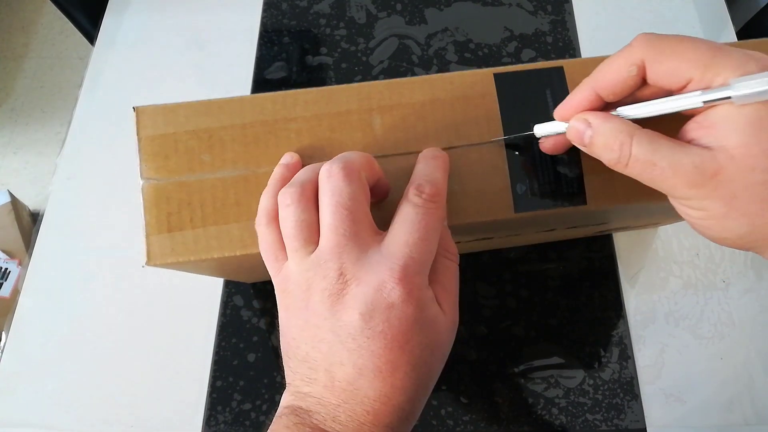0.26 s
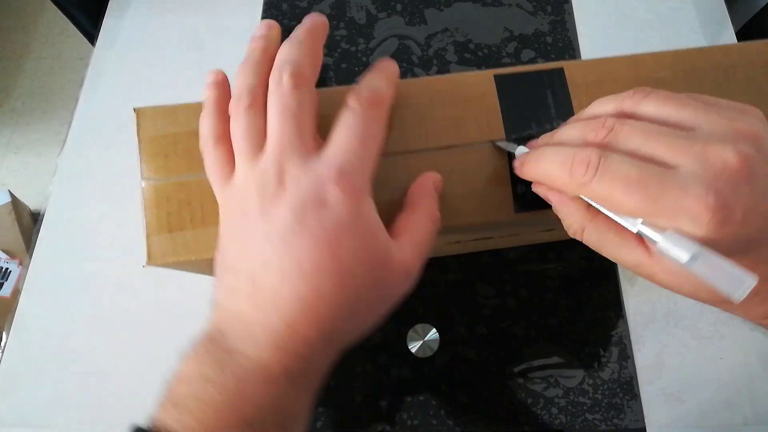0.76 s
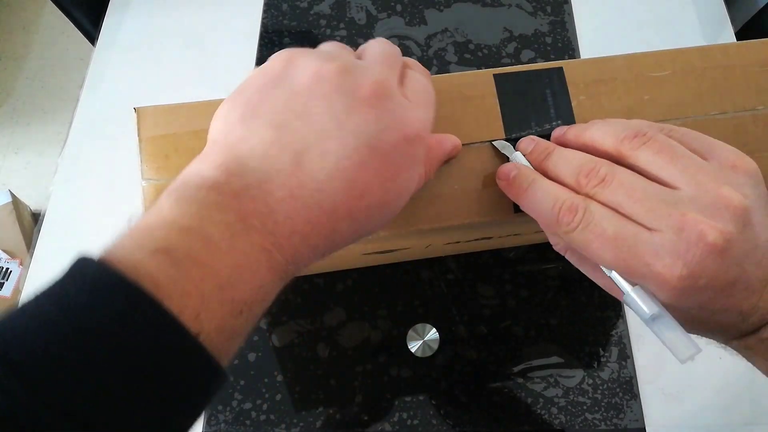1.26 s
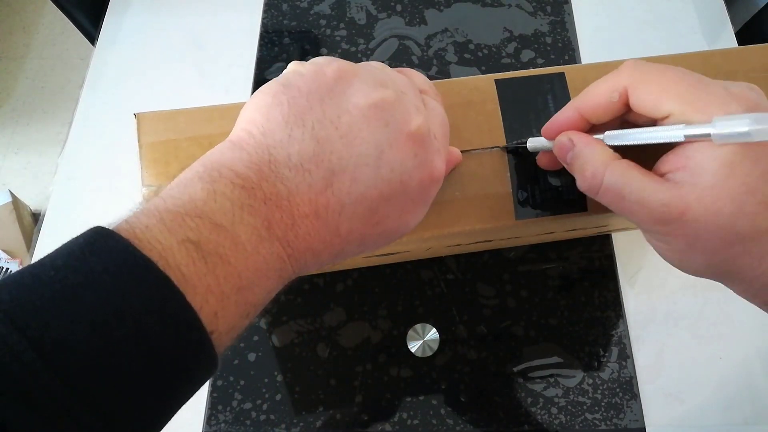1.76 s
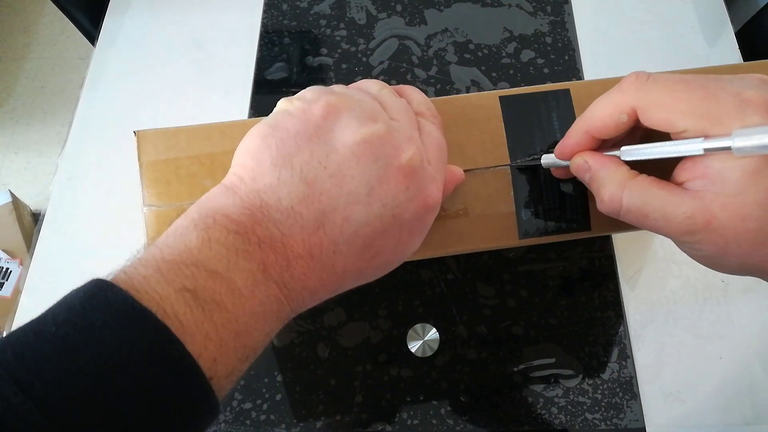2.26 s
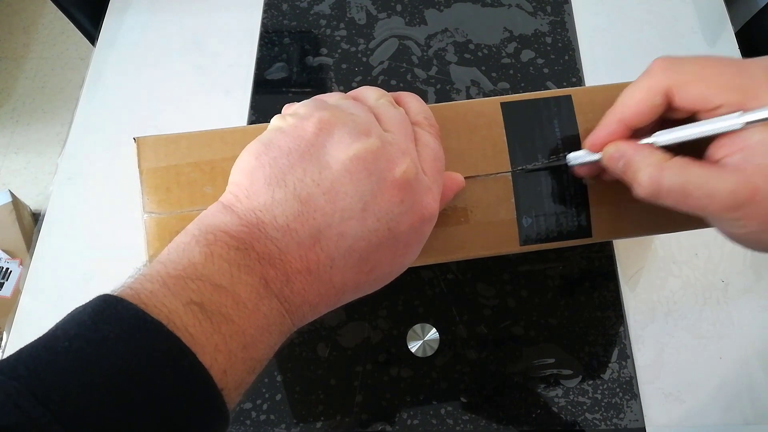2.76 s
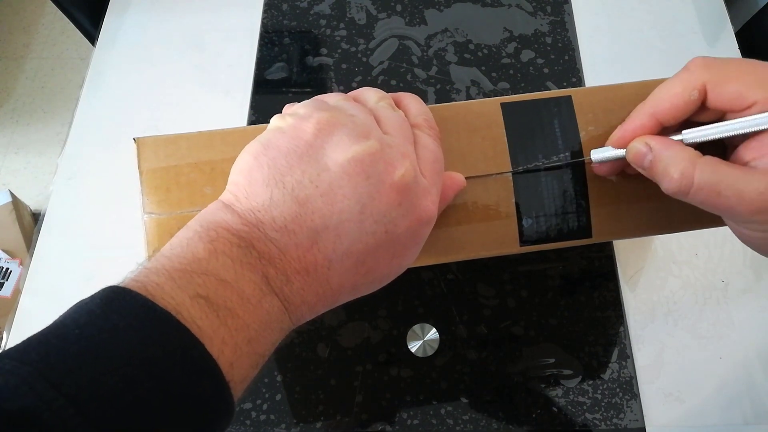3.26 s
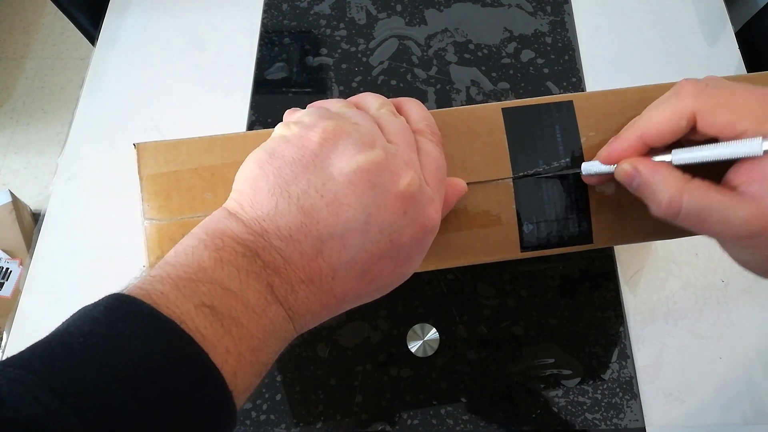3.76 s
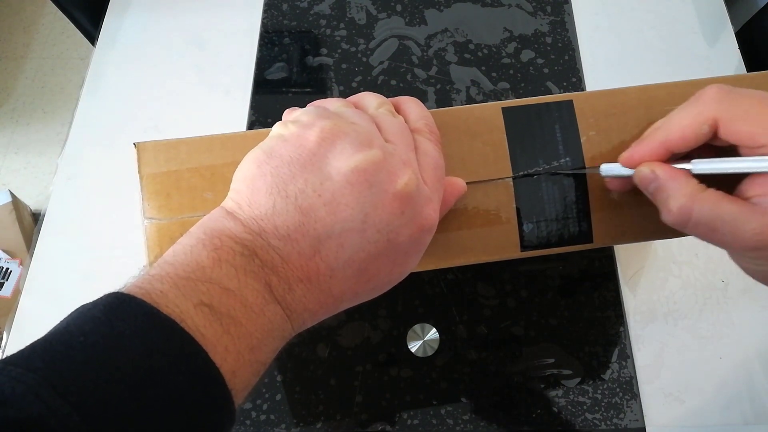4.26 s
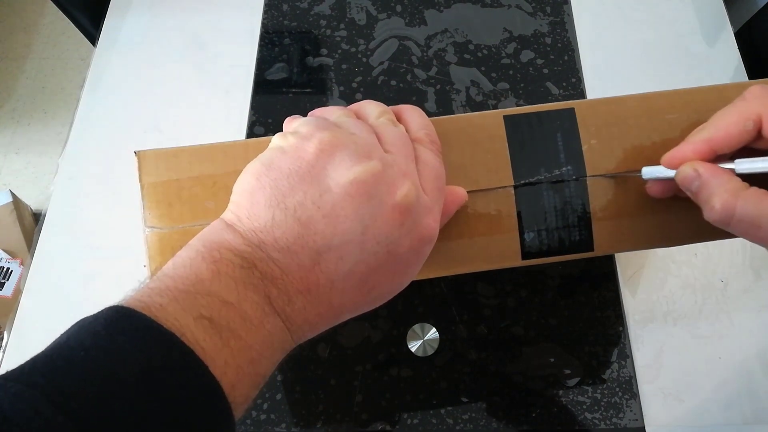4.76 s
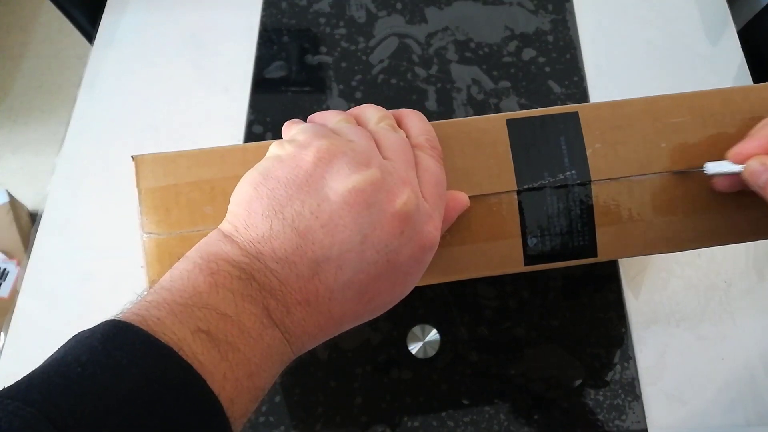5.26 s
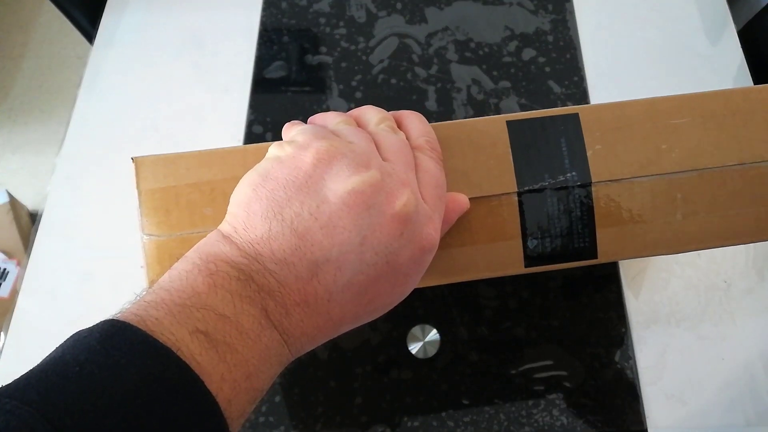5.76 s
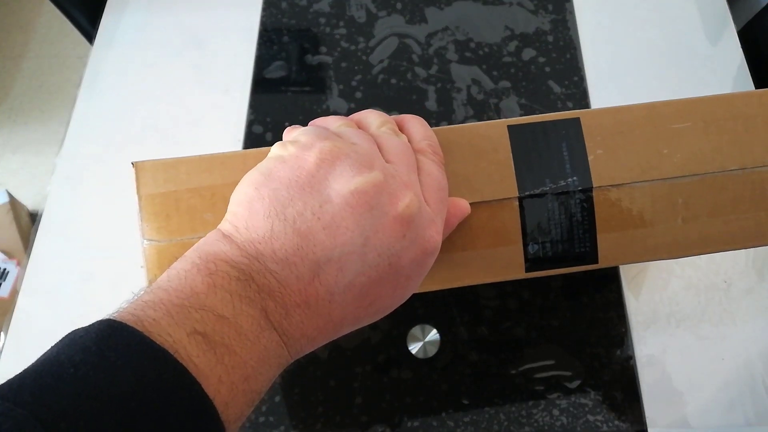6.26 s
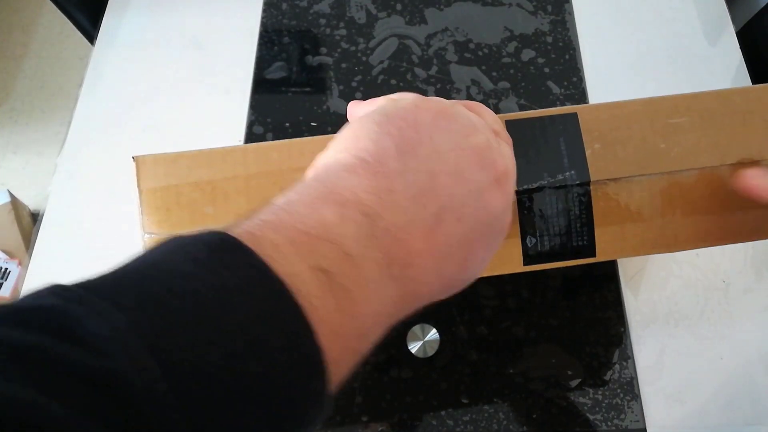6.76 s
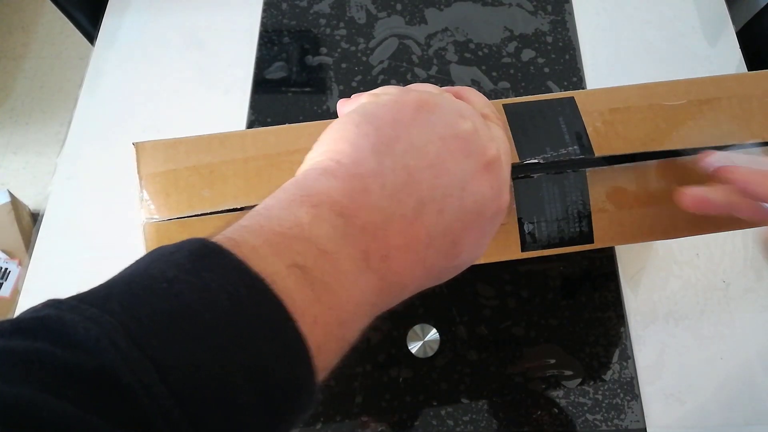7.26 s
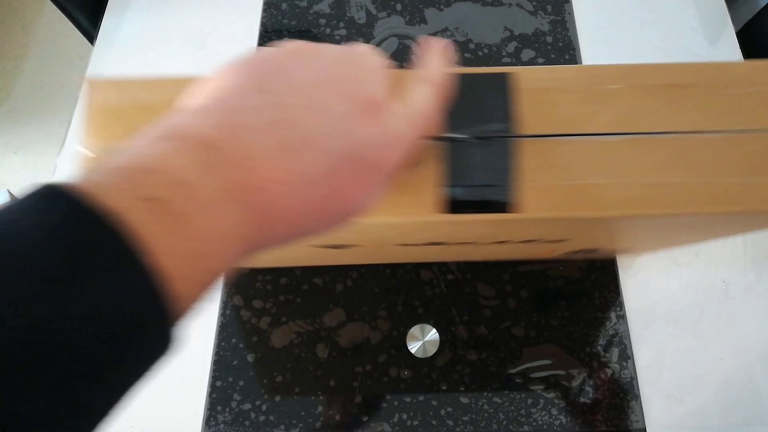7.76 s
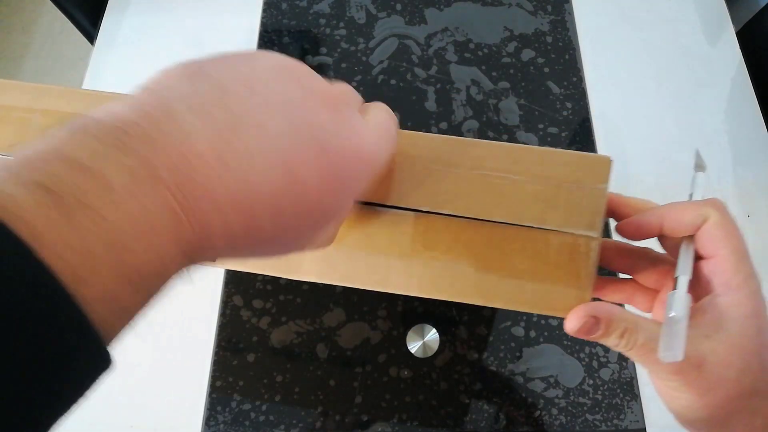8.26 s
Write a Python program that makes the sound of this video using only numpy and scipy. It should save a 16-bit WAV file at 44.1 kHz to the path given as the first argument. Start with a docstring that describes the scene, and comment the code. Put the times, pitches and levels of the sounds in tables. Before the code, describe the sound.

Tape hisses and snaps as a blade rasps along a cardboard box seam, while hands knock and shift the hollow box indoors.

```python
"""A light tap, a scrape and a hollow knock: a craft knife is worked along the taped seam of a long
cardboard box, under a camera's stereo microphone in a small hard room. The blade rasps on the card and
slits the hissing tape in strokes; tape snaps, fingers and blade tap the box, whose air and walls boom.
The seam's treble reaches the right microphone port more strongly. A quiet room tone lies underneath."""
import sys
import numpy as np
from scipy import signal
from scipy.fft import rfft, irfft, next_fast_len
from scipy.io import wavfile
from scipy.ndimage import map_coordinates

SR = 44100
rng = np.random.default_rng(int(sys.argv[2]) if len(sys.argv) > 2 else 0)


def bounce(signal):
    """Save signal as a 16-bit WAV file at the path given by the first command-line argument."""
    frames = np.transpose(np.atleast_2d(signal))
    limited = np.clip(frames, -1, 1)
    pcm = np.round(limited * 32767).astype(np.int16)
    wavfile.write(sys.argv[1], SR, pcm)


N = 375732

# Snaps and taps. Each row: start in seconds, tape tick in dB, its pitch in Hz, wall click in dB,
# its pitch in Hz, box thud in dB, the tick's left over right in dB.
BLOWS = [(0.0, -54, 6700, -34.5, 1005, -42.5, -24), (0.378, -29, 4500, -10.5, 935, -21, -2),
         (0.473, -50, 6440, -50, 2360, -42, -12), (0.524, -49, 6400, -34, 1220, -45, -5),
         (0.636, -49, 6450, -44.5, 1270, -57, -2), (0.8549, -66, 6960, -37.5, 2450, -45, -25),
         (0.866, -51, 6800, -35, 2120, -32, -30), (1.21, -52, 7860, -52, 1580, -63, -28),
         (1.231, -50, 7040, -48, 1660, -65, -18), (1.269, -45.5, 6740, -41, 2020, -72, -25),
         (1.3569, -9, 7200, -22.5, 1920, -82, -7), (1.503, -39, 6900, -45, 1390, -64, -8),
         (1.52, -41.5, 6900, -53, 1610, -68, -7), (1.6594, -29.5, 7160, -72, 2750, -68, -3),
         (2.33, -44.5, 6820, -41, 1660, -84, -6), (2.848, -36, 7060, -28, 1330, -45, -1),
         (2.887, -23.5, 7900, -58, 1320, -58, 4), (2.894, -32, 6600, -25, 1370, -41.5, 9),
         (3.1661, -30.5, 8360, -30, 1000, -46, -16), (3.169, -30.5, 3450, -22.5, 910, -39, -15.5),
         (3.2992, -51.5, 7150, -34.5, 1032, -45.5, -18), (3.551, -74, 6970, -47, 1197, -60, -9),
         (3.906, -19.5, 7540, -23.5, 1280, -47, -7.5), (3.919, -43, 7560, -23, 900, -40.5, -27),
         (3.992, -33, 7500, -25.5, 1500, -31, -10), (4.179, -52.5, 7400, -40.5, 1100, -75, -12),
         (4.4077, -40, 7300, -31, 1230, -79, -13), (4.7896, -27, 7600, -24.5, 1300, -37.5, -9),
         (4.855, -42, 7440, -30, 1420, -52, -18), (4.939, -44.5, 6840, -42.5, 1710, -86, -5),
         (6.383, -17, 8700, -35, 1243, -32.5, -6), (6.3929, -20, 6900, -15, 1210, -30, 0),
         (6.509, -48, 7140, -32.5, 1870, -42.5, -9), (6.6995, -23, 5160, -12, 2210, -77, 6),
         (6.7019, -14, 5150, -1, 2330, -36.5, -23), (6.971, -33, 5870, -35, 1600, -54, -5),
         (7.0062, -26, 6750, -24, 1380, -52, -6), (7.0103, -13.5, 7700, -7.5, 1400, -21.5, -14.5),
         (7.6438, -41, 6650, -28.5, 1880, -26, -31), (7.65, -43, 7000, -31.5, 1060, -30, 17),
         (7.689, -60, 6940, -31, 1183, -53, 2), (7.946, -56, 7000, -31.5, 2060, -47, 7),
         (7.978, -59, 7150, -35.5, 1400, -75, -5)]
# Air and wall modes of the box. Each row: pitch in Hz, level in dB, t60 in seconds,
# change in a thud's level in dB once the flaps have parted.
BOX_MODES = [(126.8, 1.5, 0.22, 15), (169.4, 7.5, 0.39, 3), (225.8, 4, 0.63, -8), (265.4, -10, 0.53, 5.5),
             (300.2, -5.5, 0.35, 6), (355, -6.5, 0.087, 1), (412, -8, 0.12, 3), (471.6, -7.5, 0.08, 0),
             (612, -13, 0.053, 8)]
# Air sound at the two ports. Each row: frequency in Hz, left-right likeness from 0 to 1.
AIR_LIKENESS = [(40, 0.98), (200, 1), (600, 0.056), (3000, 0.17), (12000, 0.026)]
SIDES = np.array([[.5], [-.5]])  # half to the left port, the opposite half to the right


def amp(db):
    return 10 ** (np.asarray(db) / 20)


def unit(x):
    return x / np.sqrt(np.mean(x ** 2) + 1e-20)


def along(points, hz):
    """A curve through (Hz, value) points on a log axis."""
    f, v = np.transpose(points)
    return np.interp(np.log(hz + 1), np.log(f + 1), v)


def wobble(rate):
    """A smooth random curve, rate knots a second."""
    return map_coordinates(rng.standard_normal(int(N * rate / SR) + 4), [np.arange(N) * rate / SR])


def filtered(x, response):
    """x through a complex response of frequency."""
    size = next_fast_len(N + SR)
    return irfft(rfft(x, size) * response(np.fft.rfftfreq(size, 1 / SR)), size)[..., :N]


def butter(x, order, hz, kind):
    return signal.sosfilt(signal.butter(order, hz, kind, fs=SR, output="sos"), x)


def spread(pair, spectrum, likeness):
    """Two unrelated signals coloured and mixed to a left-right likeness; rms 1."""
    turn = lambda hz: np.arccos(np.clip(along(likeness, hz), -1, 1)) / 2
    mid, side = filtered(pair, lambda hz: spectrum(hz) * [np.cos(turn(hz)), np.sin(turn(hz))])
    return unit(np.array([mid + side, mid - side]))


def rise(t, seconds):
    return 1 - np.exp(-t / seconds)


def tape_tick(t, db, hz):
    """Tape snaps with a brief ring and a crackle; it is too thin to move any bass."""
    ring_t60 = np.clip(-.0001 * db, .0008, .0028)  # a hard snap is over in a few swings
    ring = amp(db + 2.5 - 60 * t / ring_t60) * rise(t, 0.04 * ring_t60) ** 2 * np.sin(2 * np.pi * hz * t)
    crackle = 1.16 * butter(rng.standard_normal(len(t)), 2, [0.87 * hz, 1.353 * hz], "band")
    crackle *= amp(0.78 * db - 9 - 60 * t / 0.0062)
    return butter(ring + crackle, 4, 1100, "high")


def wall_click(t, db, hz):
    """A patch of wall, too small to move bass, clicks; the flap edge buzzes on in a narrow band."""
    ring_cycles, noise_t60, buzz_t60 = 3.45, 0.013, 0.33
    ring = amp(db + 5.5 - 60 * t * hz / ring_cycles) * rise(t, 0.00029) * np.sin(2 * np.pi * hz * t)
    noise = amp(db - 6 - 60 * t / noise_t60) * butter(rng.standard_normal(len(t)), 3, 2 * hz, "low")
    buzz = butter(rng.standard_normal(len(t)), 2, [2210, 2697], "band")
    buzz *= amp(db - 23.5 - 60 * t / buzz_t60)
    return butter(ring + noise + buzz, 3, 0.57 * hz, "high")


def box_thud(t, db, start):
    """The wall gives under a blow in one dull push, and the box modes near that pitch ring on."""
    # The boom shifts with the grip and as the flaps part. Each row: time in seconds, centre in Hz.
    boom_centres = [(0, 219), (.38, 200), (.6, 219), (.85, 160), (3.0, 174), (3.2, 302), (3.9, 187),
                    (6.4, 178), (6.7, 297)]
    centre_hz = np.interp(start, *np.transpose(boom_centres))
    parted = start > 6.9  # the flaps gape from here on and push less air
    hz, mode_db, t60, parted_db = np.transpose(BOX_MODES)[:, :, None]
    drive_db = -18 * np.abs(np.log2(hz / centre_hz)) + rng.normal(0, 2.5, hz.shape)
    skew = hz / 900 * rng.normal(0, 0.73, hz.shape) * SIDES[:, None]  # high modes arrive out of step
    grip = rng.standard_normal((len(BOX_MODES), 16))  # each mode swells and sags as the grip shifts
    waver_db = 2.8 * np.array([map_coordinates(knots, [t * 28]) for knots in grip])
    ring_db = db - 10.5 + mode_db + parted_db * parted + drive_db + waver_db - 60 * t / t60
    ring = np.sum(amp(ring_db) * np.sin(2 * np.pi * hz * t + skew), 1)
    push = amp(db + 5.5 - 11.5 * parted - 60 * t / 0.033) * np.sin(2 * np.pi * centre_hz * t)
    return (ring + push) * rise(t, 0.0011)  # the air inside takes a moment to swing up


def snaps_and_taps():
    """Each blow is a tape tick, a wall click and a box thud, too blunt for the top octave."""
    out, t = np.zeros((2, N + SR)), np.arange(SR // 2) / SR
    for start, tape_db, tape_hz, wall_db, wall_hz, thud_db, pan_db in BLOWS:
        tick = tape_tick(t, tape_db, tape_hz) * amp(pan_db * SIDES)
        click = wall_click(t, wall_db, wall_hz) * amp(0.033 * pan_db * SIDES)
        k = round((start + .0003) * SR)
        out[:, k:k + len(t)] += tick + click + box_thud(t, thud_db, start)
    dull = lambda hz: (1 / (1 + 1j * hz / 10000 * 1.045 - (hz / 10000) ** 2)) ** 2
    return filtered(out[:, :N], dull)


def pressure(t):
    """Gains of wall rasp, tape hiss and box drumming: the long cut, strokes, shaking after each blow."""
    # The long cut to the end of the seam. Each row: time in seconds, then rasp, hiss and drumming in dB.
    long_cut = [(5.148, -73, -75, -80), (5.269, -61.5, -59.5, -69), (5.451, -58.5, -56, -58.5),
                (5.7, -53.5, -52, -54.5), (5.901, -57.5, -55, -56), (5.97, -60, -59, -57),
                (6.052, -68, -77, -72)]
    # Blade and hands along the box. Each row: start and length in seconds, first and last rasp level
    # in dB, then hiss and drumming in dB over the rasp.
    strokes = [(0.01, 0.44, -69, -74.5, -5.5, 4.5), (0.663, 0.083, -64.5, -65.5, -3, 3.5),
               (0.872, 0.013, -68.5, -78, 7, 7), (0.955, 0.2, -65.5, -74.5, 0, -0.5),
               (1.415, .12, -85, -72, 3, 1.5), (1.966, 0.012, -70, -80, -1, 2),
               (2.116, 0.011, -66, -80, -2, -9), (2.314, 0.28, -77, -67.5, -1.5, -9),
               (2.638, 0.19, -71.5, -54.5, -7, -6), (4.197, 0.08, -59, -67.5, -2.5, -2),
               (4.317, 0.026, -53.5, -52, -3.5, -5), (4.408, 0.1, -50, -66, -2.5, -2.5),
               (4.609, 0.087, -54.5, -65.5, -2.5, -4.5), (4.739, 0.13, -61, -67, 2.5, 6.5),
               (4.905, 0.22, -74.5, -71.5, 2.5, -13), (6.066, 0.039, -65.5, -62, 0, -6),
               (6.14, 0.062, -53.5, -50.5, 2.5, -6.5), (6.342, 0.029, -60.5, -57.5, -0.5, 0),
               (6.499, 0.011, -61.5, -62, 2.5, 3), (6.609, 0.065, -70, -63.5, -1.5, -7),
               (6.754, 0.37, -57, -63.5, 1.5, -2.5), (7.237, 0.326, -91, -79, -1.5, 12),
               (7.655, 0.056, -53.5, -59, 1.5, -15), (7.757, 0.4, -56, -58.5, 4.5, -4),
               (8.225, 0.1, -74, -68, 6, -2), (8.389, 0.017, -60.5, -59, -6.5, 4),
               (8.446, 0.098, -62.5, -62, 6.5, -5)]
    attack_db_per_s, release_db_per_s = 499, 355.5
    times, *levels = np.transpose(long_cut)
    gains = amp([np.interp(t, times, db, -150, -150) for db in levels])
    for start, length, first_db, last_db, tape_db, drum_db in strokes:
        age = t - start
        held = np.clip(age, 0, length)
        edge_db = attack_db_per_s * np.minimum(age, 0) - release_db_per_s * np.maximum(age - length, 0)
        rasp_db = first_db + (last_db - first_db) * held / length + edge_db
        gains += amp(rasp_db) * amp([[0], [tape_db], [drum_db]])
    for start, tape_db, _, wall_db, _, thud_db, _ in BLOWS:
        k = round(start * SR)
        age = t[k:k + SR] - start
        gains[0, k:k + SR] += amp(wall_db - 38 - 60 * age / 0.25)  # the flaps rustle on
        gains[1, k:k + SR] += amp(tape_db - 35.5 - 60 * age / 0.066)  # the tape fizzes on
        gains[2, k:k + SR] += amp(thud_db - 12.5 - 60 * age / 0.38)  # the box drums on
    return gains


def blade_catches():
    """The edge catches now and then: a gain that jumps above 1 and falls straight back."""
    per_second, fall_s = 19, 0.0021
    jolts = (rng.random(N) < per_second / SR) * rng.uniform(0.19, 1, N)
    return 1 + amp(-4.5) * signal.lfilter([1], [1, -np.exp(-1 / (fall_s * SR))], jolts)


def grit(per_second, spread_db):
    """Fibres giving way: random slips of uneven size, heard along two paths."""
    slips = rng.random(N) < per_second / SR
    sizes = amp(spread_db * np.minimum(rng.standard_exponential(N), 4))
    return slips * sizes * rng.standard_normal((2, N))


def flap_singing(t):
    """The flap edge sings under the blade: a fuzzy resonance that wanders."""
    # The edge's note. Each row: time in seconds, pitch in Hz, level in dB over the wall rasp.
    edge_notes = [(0, 1318, -6), (2.301, 1308, 3.5), (2.901, 1399, 2.5), (4.202, 1089, 6),
                  (4.452, 1290, -1), (5.3, 1250, 0), (5.54, 1234, 3), (5.69, 1540, -0.5), (5.789, 1322, 0),
                  (6.6, 1258, -20.5)]
    times, hz, db = np.transpose(edge_notes)
    pitch = np.interp(t, times, hz) * (1 + 0.04 * wobble(30))
    phase = 2 * np.pi * np.cumsum(pitch) / SR
    swell = amp(1.4 * wobble(14))
    fuzzy_note = wobble(600) * np.sin(phase) + wobble(600) * np.cos(phase)
    return amp(np.interp(t, times, db)) * unit(swell * fuzzy_note)


def box_response(hz):
    """The box modes as resonators of alternating sign; the faster the decay, the wider the peak."""
    response = 0
    for k, (mode_hz, db, t60, _) in enumerate(BOX_MODES):
        damping = 1j * hz * np.log(1000) / (np.pi * t60)
        response += (-1) ** k * amp(db) * damping / (mode_hz ** 2 - hz ** 2 + damping)
    return response


def tape_rips(t):
    """Short rips swell before they let go: added gains of wall rasp and tape hiss."""
    # Each row: crest in seconds, rasp and hiss in dB, swell and fall times in seconds.
    rips = [(2.856, -51, -49.5, 0.01, 0.009), (2.896, -48, -41.5, 0.0073, 0.0055),
            (4.753, -46.5, -49.5, 0.013, 0.019), (6.385, -35, -36.5, 0.011, 0.014),
            (6.853, -49, -39, 0.0025, 0.0054), (6.913, -75, -44.5, 0.0034, 0.0039),
            (7.943, -94, -45, 0.0054, 0.0119)]
    gains = np.zeros((2, N))
    for crest, wall_db, tape_db, swell, fall in rips:
        shape = np.exp(-np.abs(t - crest) / np.where(t < crest, swell, fall))
        gains += amp([[wall_db], [tape_db]]) * shape
    return gains


def box_squeaks(t):
    """The box chirps on the counter in short, fluttering tones."""
    # Each row: centre in seconds, pitch in Hz, level in dB, half length in seconds.
    chirps = [(7.322, 4930, -67, 0.0051), (7.877, 6780, -34, 0.01), (7.879, 5070, -44.5, 0.0082),
              (7.951, 7100, -44, 0.0052)]
    return sum(amp(db) * wobble(260) * np.exp(-((t - at) / half) ** 2) * np.sin(2 * np.pi * hz * t)
               for at, hz, db, half in chirps)


def rubbing():
    """Slips of the blade excite wall, tape and box air; the hand's pressure trembles."""
    # Rasp of the cardboard and hiss of the tape. Each row: frequency in Hz, spectral density in dB.
    rasp_spectrum = [(400, -18), (600, -3.5), (780, -4), (1250, -4.5), (1700, -5), (2300, -5), (3100, -10),
                     (4200, -20.5), (6000, -53.5)]
    hiss_spectrum = [(2800, -7.5), (4100, -5), (5100, -3), (5900, -1), (7000, 2), (8500, -1), (10000, -10),
                     (13000, -23), (16000, -33.5)]
    # Rasp and hiss at the two ports. Each row: frequency in Hz, left-right likeness from 0 to 1.
    rub_likeness = [(300, 0.39), (700, 1), (1300, 1), (3000, 0.1), (12000, 0.076)]
    # The seam as the microphone hears it. Each row: frequency in Hz, left over right in dB.
    port_balance = [(60, 4.5), (240, -1.5), (950, 0), (3770, -3), (15000, -12)]
    left_lag_s = 0.000786  # the scrape reaches the left port later
    t = np.arange(N) / SR
    wall_gain, tape_gain, drum_gain = pressure(t)
    wall_gain *= amp(0.91 * wobble(35) + 2.0 * wobble(110))
    tape_gain *= amp(1.2 * wobble(30))
    catches = blade_catches()
    wall_surge, tape_surge = tape_rips(t)
    wall_gain = wall_gain * catches + wall_surge
    tape_gain = tape_gain * np.sqrt(catches) + tape_surge
    rasp = spread(grit(3000, spread_db=-2.5), lambda hz: amp(along(rasp_spectrum, hz)), rub_likeness)
    singing = flap_singing(t)
    hiss = spread(grit(12000, spread_db=2.5), lambda hz: amp(along(hiss_spectrum, hz)), rub_likeness)
    drumming = spread(grit(4000, spread_db=1), box_response, AIR_LIKENESS)
    scrape = wall_gain * (rasp + singing) + tape_gain * hiss
    scrape = filtered(scrape, lambda hz: np.exp(-2j * np.pi * hz * left_lag_s * SIDES))
    seam = scrape + drum_gain * drumming + box_squeaks(t)
    return filtered(seam, lambda hz: amp(SIDES * along(port_balance, hz)))


def room_answer():
    """Near reflections, then a tail whose every frequency dies at its own speed."""
    # Decay of the small hard room. Each row: frequency in Hz, t60 in seconds.
    decay_times = [(100, 0.7), (300, 0.2), (1800, 0.38), (4000, 0.36), (8000, .26), (13000, 0.09)]
    # Table and near walls. Each row: mean delay in seconds, level in dB.
    reflections = [(.0028, -10.5), (.0095, -13.5)]
    hz, t, bands = signal.stft(rng.standard_normal((2, SR // 2)), SR, nperseg=256)
    likeness = np.clip(along(AIR_LIKENESS, hz), 0, 1)[:, None]
    bands[1] = likeness * bands[0] + np.sqrt(1 - likeness ** 2) * bands[1]
    decay = amp(-60 * t / along(decay_times, hz)[:, None])
    weak_bass = (hz / (hz + 400))[:, None]
    tail = signal.istft(bands * decay * weak_bass, SR, nperseg=256)[1]
    echo = np.pad(amp(-9.5) * tail / np.linalg.norm(tail[0]), ((0, 0), (200, 0)))
    for delay, db in reflections:
        echo[[0, 1], (SR * delay * rng.uniform(.85, 1.15, 2)).astype(int)] += amp(db)
    return echo


def room_echo(mono):
    """Hands and box keep moving, so each short stretch of sound meets a fresh answer of the room."""
    hop = SR // 8
    out, fade = np.zeros((2, N + 2 * SR)), np.hanning(2 * hop + 1)[:-1]
    source = np.pad(mono, (hop, 2 * hop))
    for k in range(0, N + hop, hop):
        wet = signal.fftconvolve((source[k:k + 2 * hop] * fade)[None], room_answer(), axes=1)
        out[:, k:k + wet.shape[1]] += wet
    return out[:, hop:hop + N]


def room_tone():
    """Steady air noise, alike at both ports in the bass only."""
    # The room's air. Each row: frequency in Hz, spectral density in dB.
    air_spectrum = [(13, -30), (22, -6.5), (44, 1), (122, -3.5), (160, -4.5), (211, -1.5), (347, -10),
                    (585, -17), (1230, -12.5), (2260, -21), (7190, -21), (9740, -26), (16000, -45)]
    gain = amp(-68 + 0.6 * wobble(1.7))
    air = spread(rng.standard_normal((2, N)), lambda hz: amp(along(air_spectrum, hz)), AIR_LIKENESS)
    return gain * air


def scene():
    """Knife work in the room; a small box radiates little deep bass, but the counter passes some on."""
    cutoff_hz, counter_db = 110, -25.5
    work = rubbing() + snaps_and_taps()
    high_pass = lambda hz: 1 / np.polyval(np.poly(signal.buttap(8)[1]), cutoff_hz / (1j * hz + 1e-6))
    in_room = work + room_echo(work[1])
    return filtered(in_room, lambda hz: high_pass(hz) + amp(counter_db)) + room_tone()


def record(dry):
    """The camera keeps nothing above its band limit."""
    return filtered(dry, lambda hz: hz < 16600)


dry = scene()
out = record(dry)
bounce(out)
```